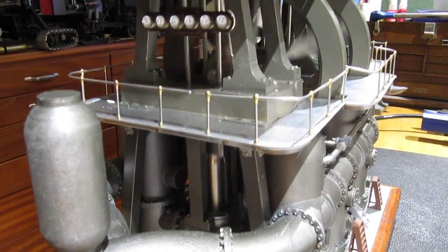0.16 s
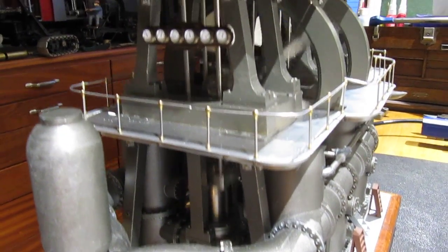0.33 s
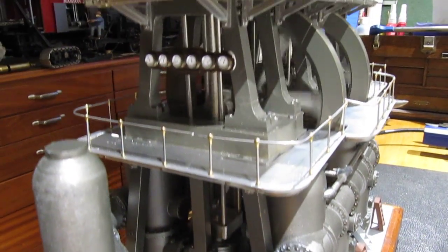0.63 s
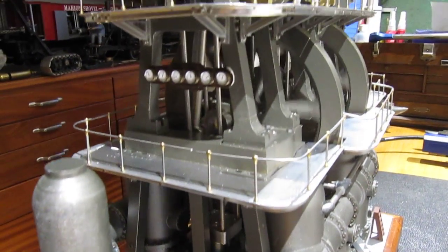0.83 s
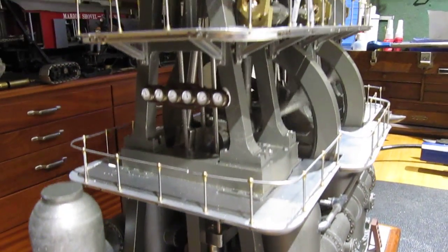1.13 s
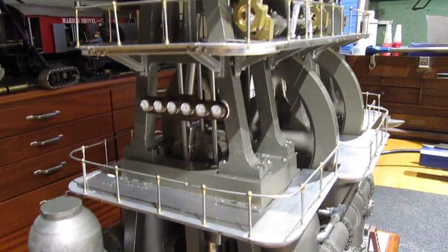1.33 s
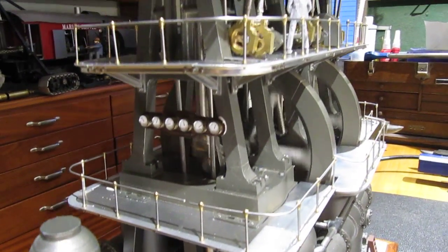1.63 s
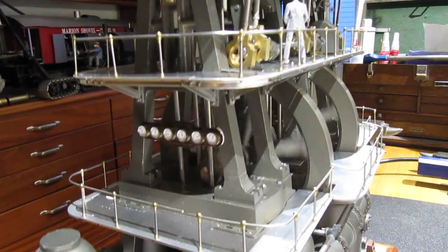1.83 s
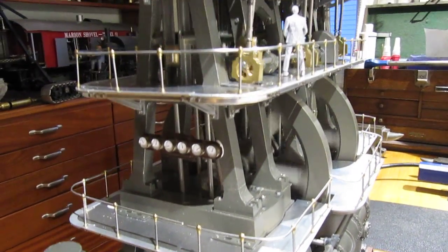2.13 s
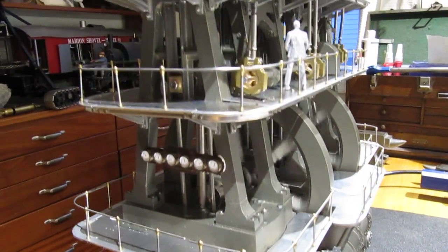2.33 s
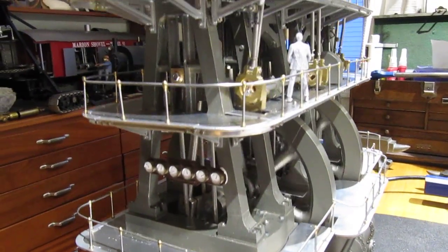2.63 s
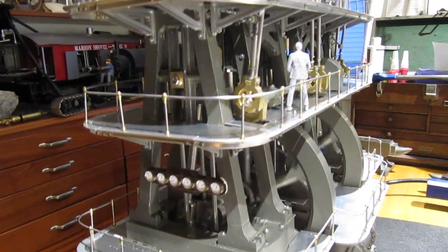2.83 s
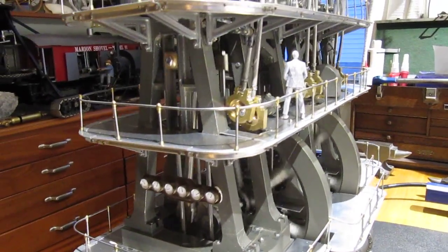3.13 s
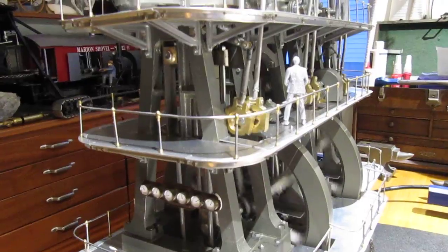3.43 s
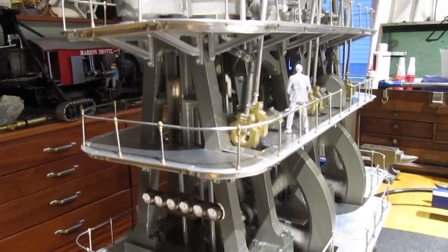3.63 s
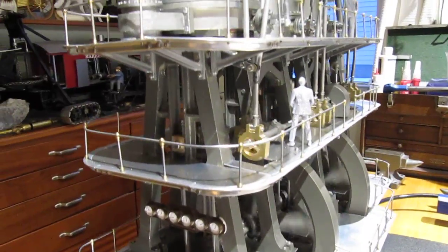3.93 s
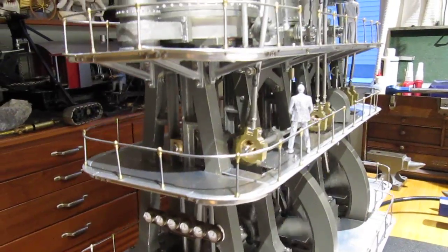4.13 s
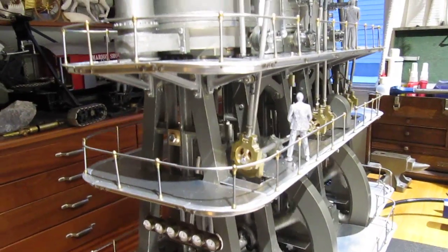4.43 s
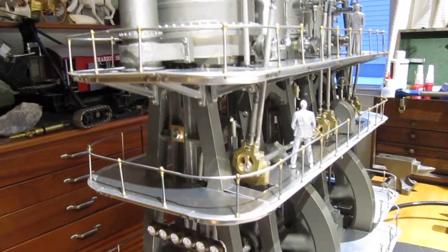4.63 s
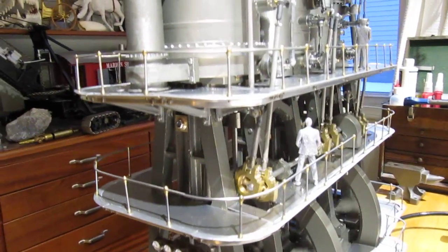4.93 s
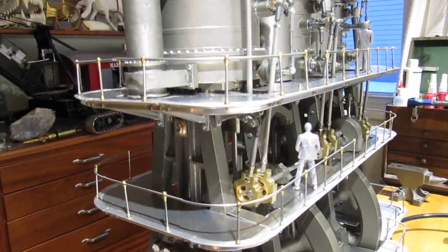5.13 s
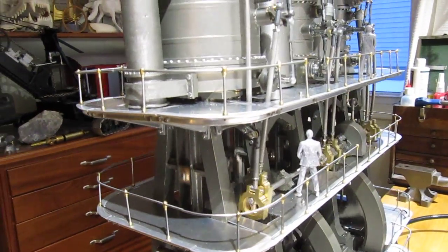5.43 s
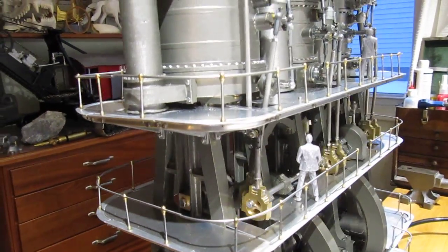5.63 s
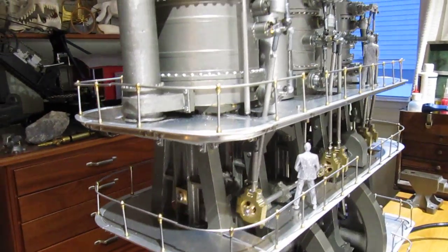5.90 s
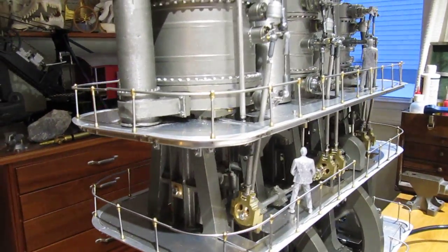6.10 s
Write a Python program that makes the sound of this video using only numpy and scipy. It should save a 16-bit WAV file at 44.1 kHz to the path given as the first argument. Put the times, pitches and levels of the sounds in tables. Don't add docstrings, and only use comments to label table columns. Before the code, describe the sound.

A small model steam engine runs on pressure in an indoor workshop, close to a slowly rising microphone. At 0 s a thin hissing stroke with a faint whistle is closing. Near 0.16 s a bright, crisp jet of air bursts for about a tenth of a second, with a dull knock at 0.22 and another at 0.47, each with tiny rattling rebounds. A strong puff comes at 0.7, a shorter one at 0.84, then a long hiss fades past 1.1 while a weak whistle slides down from high to middle pitch around 1.2-1.5. The cycle repeats with jets near 1.8, 3.5 and 5.2, knocks at 1.86 and 2.11, 3.55 and 3.81, 5.23 and 5.48, and puffs around 2.35, 4.05 and 5.7. Low gear hum stays faint, easing mid-stroke; the room adds a short, light tail. It ends at 6.26 during another thin leaking stroke.

```python
import sys
import numpy as np
from scipy import signal
from scipy.fft import rfft, irfft
from scipy.io import wavfile
from scipy.ndimage import uniform_filter1d

SR = 44100
rng = np.random.default_rng(int(sys.argv[2]) if len(sys.argv) > 2 else 0)


def boost_factor(decibels):
    exponent = np.asarray(decibels, float) / 20
    return 10 ** exponent


def wrap_up_sound(samples):
    columns = np.atleast_2d(samples).T
    tamed = np.clip(columns, -1, 1)
    steps = np.round(tamed * 32767).astype(np.int16)
    wavfile.write(sys.argv[1], SR, steps)


N = 276103
SIZE, HOP = 1024, 256
RUMBLE_DB, EASE_DB, EASE_AT_S, EASE_S = -46, -11, -0.69, 0.3

# centre_hz, width_hz, level_db
KNOCK_PORT_MODES = [(2270, 330, -7), (2870, 380, -17), (3260, 890, -5.5), (3930, 130, -8.5),
                    (4950, 330, -3.5), (5480, 370, -3), (7300, 440, -1.5), (8300, 1000, 0), (8860, 410, 6),
                    (10300, 300, -25.5), (12200, 400, -21), (13100, 300, -32)]
PUFF_PORT_MODES = [(2510, 730, -10.5), (3480, 1100, -5), (5190, 600, 0.5), (6500, 250, -12.5),
                   (7170, 740, 13), (8700, 460, 15.5), (10800, 300, -19), (11800, 970, -6.5),
                   (13000, 460, -17), (15300, 300, -20)]
LONG_PORT_MODES = [(2280, 310, -5.5), (2893, 320, -4), (3370, 490, -3), (4230, 300, -7), (5680, 920, -1.5),
                   (6160, 190, -3), (7400, 450, 0), (8690, 940, 6), (9540, 140, 4.5), (11760, 670, -13.5)]
# freq_hz, level_db
BETWEEN_MODES = [(1200, -29.5), (2000, -13.5), (4500, -17), (8000, -1), (10000, -63), (12000, -36.5),
                 (15500, -35)]
# freq_hz, density_db_per_hz
JET_SPECTRUM = [(3820, -37), (6500, -14), (7610, -30), (8370, -2), (9830, 2), (11300, -11), (12000, -10),
                (12700, -9), (14400, -22), (15600, -25)]
# freq_hz, density_db_per_hz
WASH_SPECTRUM = [(150, -59), (250, -16.5), (429, -3.5), (499, -10), (564, -6), (742, -6.5), (958, -4),
                 (1680, -8), (2400, -7.5), (3120, -7), (5280, -120)]
# freq_hz, density_db_per_hz
HUM_SPECTRUM = [(12, -30), (25, -9.5), (55, -12.5), (75, -12), (90, 0), (108, -10.5), (170, -4.5),
                (215, -6.5), (300, -7.5), (400, -6), (445, -0.5), (500, -26), (700, -20)]
# time_s, delay_ms
DECK_ECHO = [(0, 0.29), (1.9, 0.3), (3.6, 0.33), (5.2, 0.346), (6.26, 0.36)]
# time_s, blow_db, brightness_db_per_octave
KNOCKS = [
    (0.216, -18.5, 3.5),
    (0.473, -21, 3),
    (1.858, -20.5, 4),
    (2.107, -19.5, 3.5),
    (3.554, -19, 3.5),
    (3.812, -21.5, 4),
    (5.23, -20.5, 4),
    (5.481, -19.5, 2),
]
# delay_s, level_db
BOUNCES = [
    [(-.008, -9), (-.002, 2.5), (.005, -3.5), (.027, -6)],
    [(-.007, -10.5), (-.001, -0.5), (.019, -3), (.038, -5)],
]
# freq_hz, level_db, t60_s
FRAME_MODES = [(87, -6.5, 0.23), (135, -6.5, 0.16), (167, -1.5, 0.23), (192, -3, 0.3), (260.5, -5.5, 0.15),
               (330, -2, 0.078), (359, -3.5, 0.06), (448, -6.5, 0.098), (600, -18, 0.064),
               (1010, -18, 0.038), (1368, -23.5, 0.16)]
TURNS_S = [
    .216,
    1.856,
    3.554,
    5.23,
    6.91,
]
GUST_TIMING = {"exhaust": (-.055, .105), "knock stroke": (-.06, .425), "puff": (.482, .04),
               "reopening": (.625, .04), "long stroke": (.7, .23), "second exhaust": (-.79, .17),
               "breath": (-.47, .08), "stroke end": (-.34, .175), "jolt": (.238, .02), "lift": (.335, .03),
               "sigh": (.555, .05)}
GUST_SHAPE = {"exhaust": (0.16, 144, 170), "knock stroke": (3.73, 290, 290), "puff": (-1.1, 270, 265),
              "reopening": (-1.6, 330, 360), "long stroke": (-2, 85, 40), "second exhaust": (-1.4, 81, 80),
              "breath": (-0.84, 240, 120), "stroke end": (3.4, 90, 350), "jolt": (-1.3, 390, 470),
              "lift": (0.83, 460, 530), "sigh": (1.3, 140, 370)}
GUST_DB = {"exhaust": (-25.5, -26, -26.5, -28, None), "knock stroke": (-33, -34, -34.5, -35, None),
           "puff": (-25, -24, -23.5, -25.5, None), "reopening": (-26, -26.5, -29.5, -27, None),
           "long stroke": (-29, -28.5, -31, -30, None), "second exhaust": (None, -34.5, -35.5, -35.5, -34),
           "breath": (None, -31.5, -31.5, -32.5, None), "stroke end": (-33.5, -35, -36.5, -37.5, None),
           "jolt": (-37, -32, -32, -34, None), "lift": (-33, -32.5, -32, -36, None),
           "sigh": (-42, -45, -45, -42, None)}
REACH_DB = {"exhaust": (-30, -77, -58, -5.5, -1.5, -11), "knock stroke": (-14, 0, -3.5, 2, -17.5, -22.5),
            "puff": (-12.5, 0, -5, 1, -15.5, -18.5), "reopening": (-16, -1, -4, -4.5, -13, -26),
            "long stroke": (-18, 0, -5, -0.5, -17, -57), "second exhaust": (-74, -7, -8, 9, -0.5, -10.5),
            "breath": (-12, -3, -12.5, -4.5, -14, -20), "stroke end": (-19.5, -1, -4.5, 1, -17, -21),
            "jolt": (-24, -0.5, -7, -7, -12.5, -14), "lift": (-14.5, 1.5, -4.5, -16.5, -13, -24),
            "sigh": (-6, -2, -3, -14, 0, -5)}
TILT_DB_PER_OCTAVE = {"exhaust": (-2.5, -.4, -0.2, 1, 0), "knock stroke": (1, 0.0004, 0.27, -1.3, 0),
                      "puff": (1, 0.037, 0.22, -1.7, 0), "reopening": (1.2, -0.061, -0.4, -.8, 0),
                      "long stroke": (1, 0.99, -0.94, -1.1, 0), "second exhaust": (0, -1.4, .3, -0.43, 1.4),
                      "breath": (0, 0.67, 0.15, -.6, 0), "stroke end": (0.4, 0.64, .2, -0.88, 0),
                      "jolt": (.1, .1, .1, .1, 0), "lift": (-0.12, -0.39, .1, -0.84, 0),
                      "sigh": (0.045, .1, -.6, .1, 0)}
OUTLET_HZ = [1000, 3000, 5600, 8200, 10500, 13500]
GUST_PORT = {"exhaust": 0, "knock stroke": 0, "jolt": 0, "lift": 0, "puff": 1, "sigh": 1}
SEEP_DB = (-49, -45, -41, -37, -56, -61)
LEAKS = {"seat": (.083, .1, 7500, 7520, 200), "lift": (.326, .06, 7250, 7280, 280),
         "lift top": (.325, .06, 13400, 13400, 250), "sigh": (.545, .08, 14400, 14600, 800),
         "pip": (.608, .03, 11200, 11100, 200), "chirp": (.614, .045, 11000, 8400, 200),
         "gland": (.6, .3, 4330, 4310, 50), "gland held": (-.9, .72, 4380, 4310, 50),
         "throat": (-.89, .13, 8750, 8560, 230), "first strand": (-.752, .12, 7650, 6600, 120),
         "slide": (-.655, .29, 6700, 3800, 250), "second strand": (-.55, .17, 7000, 5850, 130),
         "slide foot": (-.477, .125, 4450, 3700, 120), "breath": (-.48, .14, 970, 870, 470),
         "third strand": (-.415, .14, 7500, 7000, 140), "hoot": (-.32, .2, 3310, 3130, 340)}
LEAK_DB = {"seat": (-23.5, -32, -35, -31, None), "lift": (-24, -23.5, -26.5, -36, None),
           "lift top": (-50, -49, -53, -53, None), "sigh": (-50, -51, -53, -52, None),
           "pip": (-32, -33, -42, -42, None), "chirp": (-28, -31, -29, -28, None),
           "gland": (-41, -34, -50, None, None), "gland held": (None, -39.5, -45, None, None),
           "throat": (None, -25, -24.5, -38, -30), "first strand": (None, None, -38, -38, None),
           "slide": (None, -32, -34, -34.5, None), "second strand": (None, -39, -39, -39, None),
           "slide foot": (None, -43, -38, -38.5, None), "breath": (None, -42, -43, -41, None),
           "third strand": (None, -32, -33, -37, None), "hoot": (-30, -30, -32, -30.5, None)}
# time_s, length_s, pitch_hz, width_hz, level_db
STRAYS = [(0, .065, 6400, 250, -29), (.3, .17, 8450, 350, -29), (.36, .18, 12200, 300, -48),
          (2.02, .13, 13100, 300, -50), (2.05, .1, 7100, 500, -33), (2.09, .03, 10800, 400, -38),
          (2.93, .074, 7350, 100, -38), (3.05, .07, 6300, 90, -36), (3.19, .1, 5660, 90, -41),
          (3.68, .238, 9000, 200, -33.5), (4.693, .045, 9800, 1100, -31), (4.74, .12, 8500, 250, -39),
          (5.46, .035, 10500, 1200, -33), (5.44, .16, 3700, 450, -33), (5.68, .12, 10450, 400, -39),
          (5.663, .15, 5620, 300, -31.5), (5.88, .45, 3590, 300, -35)]


def power_of(db):
    return boost_factor(2 * np.asarray(db))


def read(points, hz):
    point_hz, level_db = np.transpose(points)
    return np.interp(np.log(hz + 1), np.log(point_hz + 1), level_db, left=-90, right=-90)


def evened(x):
    return x / np.sqrt(np.mean(x ** 2) + 1e-20)


def grid():
    return np.arange(N // HOP + 5) * HOP / SR, np.fft.rfftfreq(SIZE, 1 / SR)[:, None]


def in_band(power, lo_hz, hi_hz):
    hz = grid()[1][:, 0]
    band = power[(hz > lo_hz) & (hz < hi_hz)]
    return power / band.sum(axis=0) * SIZE / (2 * HOP) / 1.5


def turbulence(power, patchy_db, flicker_db):
    t, hz = grid()
    real, imag, eddies, bands = rng.standard_normal((len(t), len(hz), 4)).T
    eddies = evened(uniform_filter1d(uniform_filter1d(eddies, size=9, axis=0), size=7, axis=1))
    bands = evened(uniform_filter1d(uniform_filter1d(bands, size=5, axis=0), size=40, axis=1))
    spectra = np.sqrt(power) * (real + 1j * imag) * boost_factor(patchy_db * (eddies + bands))
    flicker = uniform_filter1d(rng.standard_normal(N), size=150)
    flicker = evened(uniform_filter1d(flicker, size=150))
    noise = signal.istft(spectra, nperseg=SIZE, noverlap=SIZE - HOP)[1][:N]
    return noise * boost_factor(flicker_db * flicker)


def gust(name, t):
    delay_s, held_s = GUST_TIMING[name]
    change_db, swell, fade = GUST_SHAPE[name]
    octaves = np.log2(np.array(OUTLET_HZ)[:, None] / 5600)
    out = 0
    for turn, (knock_s, db) in enumerate(zip(TURNS_S, GUST_DB[name])):
        if db is None:
            continue
        u = t - knock_s - delay_s
        held_db = change_db * np.clip(u / held_s, 0, 1)
        shape_db = held_db + swell * np.minimum(u, 0) - fade * np.maximum(u - held_s, 0)
        colour_db = np.array(REACH_DB[name])[:, None] + TILT_DB_PER_OCTAVE[name][turn] * octaves
        out = out + power_of(db + shape_db + colour_db)
    return out


def outlet(index):
    return power_of(SEEP_DB[index]) + sum(gust(name, grid()[0])[index] for name in GUST_SHAPE)


def rumble():
    spectrum = rfft(rng.standard_normal(N))
    hum = irfft(spectrum * boost_factor(read(HUM_SPECTRUM, np.fft.rfftfreq(N, 1 / SR))), N)
    t = np.arange(N) / SR
    ease = sum(np.exp(-((t - knock_s - EASE_AT_S) / EASE_S) ** 2) for knock_s in TURNS_S)
    return evened(hum) * boost_factor(RUMBLE_DB + EASE_DB * ease)


def workshop(x):
    taps = np.zeros(SR // 4)
    at = np.arange(100, len(taps) - 24, 24)
    at = at + rng.integers(0, 24, len(at))
    taps[at] = rng.choice([-1., 1.], len(at)) * boost_factor(-60 * at / SR / 0.34)
    return signal.oaconvolve(x, taps / np.linalg.norm(taps))[:N]


def wash():
    hz = grid()[1]
    power = in_band(power_of(read(WASH_SPECTRUM, hz)), 500, 1700) * outlet(index=0)
    return turbulence(power, patchy_db=1.5, flicker_db=0.64)


def knocks():
    out, t = np.zeros(N), np.arange(SR // 3) / SR
    chance = rng.uniform(-1, 1, (len(KNOCKS), 4, 2))
    tick = np.sin(2 * np.pi * 1100 * t) * boost_factor(-60 * t / 0.01)
    for k, ((time_s, blow_db, bright_db), luck) in enumerate(zip(KNOCKS, chance)):
        ring = np.zeros(len(t))
        for m, (hz, db, t60_s) in enumerate(FRAME_MODES):
            decay = boost_factor(db + bright_db * np.log2(hz / 170) - 60 * t / t60_s)
            ring += (-1) ** m * decay * np.sin(2 * np.pi * hz * t)
        ring *= 1 - np.exp(-t / .001)
        for j, ((delay_s, db), (late, harder)) in enumerate(zip(BOUNCES[k % 2], luck)):
            at = round((time_s + delay_s + 0.0014 * late) * SR)
            hit = ring + (j == 0) * boost_factor(14) * tick
            out[at:at + len(t)] += boost_factor(blow_db - 10 + db + 1.2 * harder) * hit
    return signal.sosfilt(signal.butter(2, 75, "high", fs=SR, output="sos"), out)


def leaks():
    rows = []
    for name, (delay_s, *shape) in LEAKS.items():
        for knock_s, db in zip(TURNS_S, LEAK_DB[name]):
            if db is not None:
                rows.append((knock_s + delay_s, *shape, db))
    for time_s, length_s, hz, width_hz, db in STRAYS:
        rows.append((time_s, length_s, hz, hz * .98, width_hz, db))
    return rows


def whistles():
    out, rows = np.zeros(N + SR), leaks()
    seeds = rng.standard_normal((len(rows), SR * 3 // 4, 2)) @ [1, 1j]
    for (time_s, length_s, start_hz, end_hz, width_hz, db), seed in zip(rows, seeds):
        n, r = round(length_s * SR), np.exp(-np.pi * width_hz / SR)
        fuzz = signal.lfilter([1], [1, -2 * r, r ** 2], seed[:n + HOP])[HOP:]
        fuzz = fuzz / abs(fuzz) ** 0.17
        hz = np.geomspace(start_hz, end_hz, n)
        lift = .25 + sum(1 / (1 + (2 * (hz - f) / (wide + 150)) ** 2) for f, wide, _ in LONG_PORT_MODES)
        pressure = (hz / start_hz) ** 2.4
        tone = lift * pressure * (fuzz * np.exp(2j * np.pi * np.cumsum(hz) / SR)).real
        fades = signal.windows.tukey(n, min(.11 / length_s, 1))
        at = round(time_s * SR) + SR // 4
        out[at:at + n] += boost_factor(db) * evened(tone) * fades
    return out[SR // 4:][:N]


def jet():
    t, hz = grid()
    echo_s = np.interp(t, *np.transpose(DECK_ECHO)) / 1000
    comb = abs(1 + 0.2 * np.exp(2j * np.pi * hz * echo_s)) ** 2
    power = power_of(read(JET_SPECTRUM, hz)) * comb
    fine = np.clip((hz - 12000) / 600, 0, 1)
    body = in_band(power * (1 - fine), 10000, 12300) * outlet(index=4)
    fizz = in_band(power * fine, 12300, 15500) * outlet(index=5)
    return turbulence(body + fizz, patchy_db=1.0, flicker_db=0.5)


def port_power(modes):
    hz = grid()[1]
    peaks = sum(power_of(db) / (1 + (2 * (hz - f) / width) ** 2) ** 2 for f, width, db in modes)
    return peaks + power_of(read(BETWEEN_MODES, hz))


def valve_chest():
    t, hz = grid()
    over_wide = np.clip((hz - 4500) / 300, 0, 1)
    narrow = np.clip((hz - 6600) / 300, 0, 1)
    parts = [(1 - over_wide, 1800, 4600), (over_wide - narrow, 4600, 6800), (narrow, 6800, 9200)]
    ports = []
    for modes in (KNOCK_PORT_MODES, PUFF_PORT_MODES, LONG_PORT_MODES):
        power = port_power(modes)
        ports.append(np.hstack([in_band(power * part, lo_hz, hi_hz) for part, lo_hz, hi_hz in parts]))
    flow = sum(ports[GUST_PORT.get(name, 2)] @ gust(name, t)[1:4] for name in GUST_SHAPE)
    seep = ports[2] @ power_of(np.array(SEEP_DB)[1:4, None])
    return turbulence(flow + seep, patchy_db=1.5, flicker_db=.95)


def scene():
    engine = valve_chest() + jet() + wash() + whistles() + knocks()
    return (engine + boost_factor(-10.5) * workshop(engine) + rumble())[None]


def roll_off(x):
    return signal.sosfilt(signal.butter(12, 15750, fs=SR, output="sos"), x)


def record(dry):
    return roll_off(dry)


dry = scene()
out = record(dry)
wrap_up_sound(out)
```